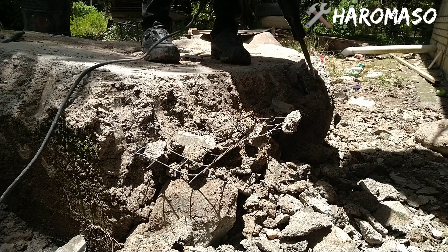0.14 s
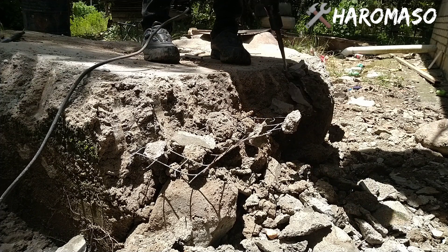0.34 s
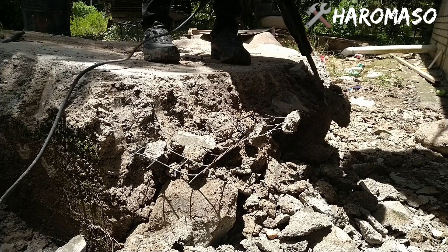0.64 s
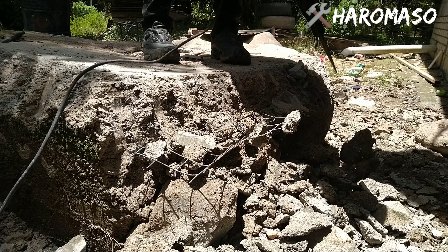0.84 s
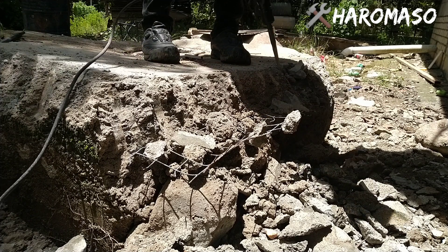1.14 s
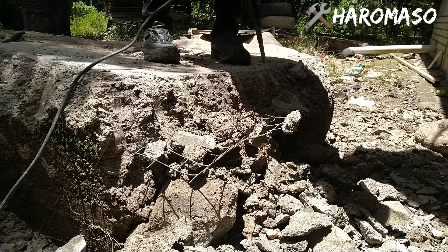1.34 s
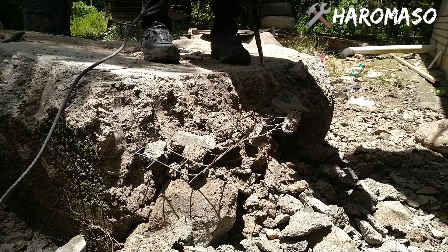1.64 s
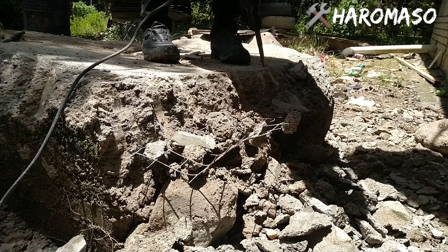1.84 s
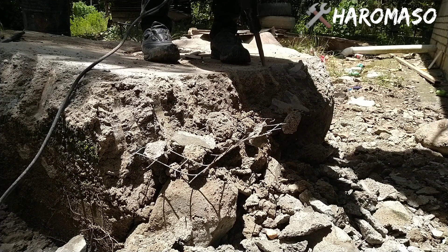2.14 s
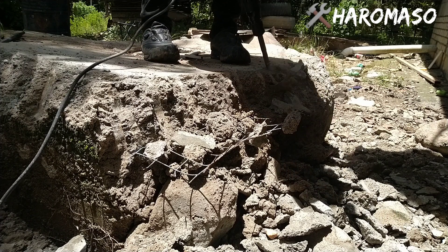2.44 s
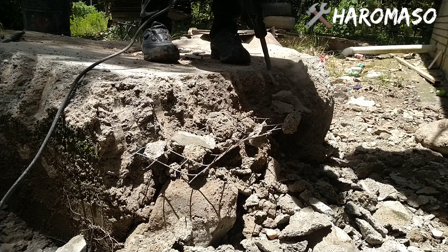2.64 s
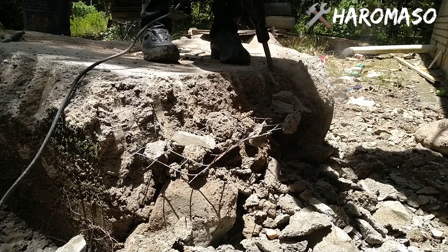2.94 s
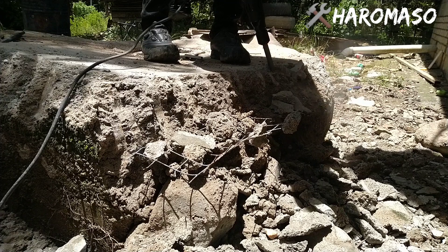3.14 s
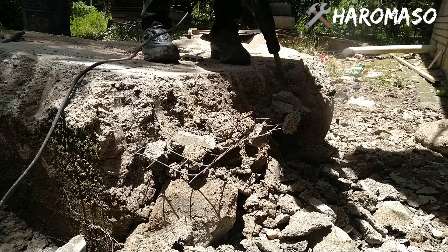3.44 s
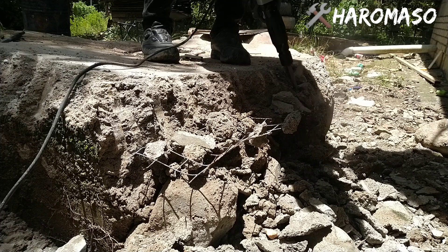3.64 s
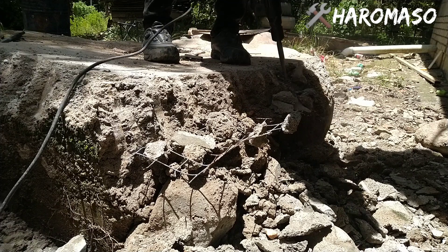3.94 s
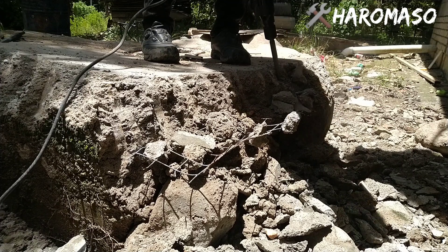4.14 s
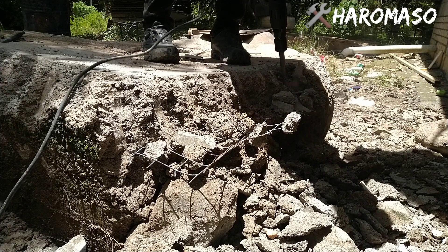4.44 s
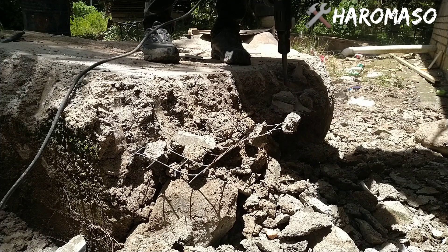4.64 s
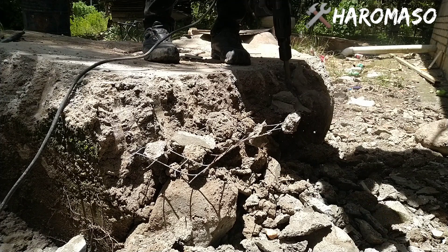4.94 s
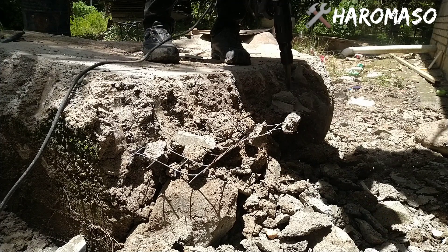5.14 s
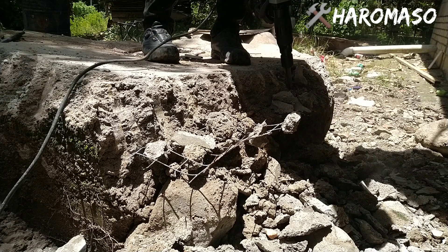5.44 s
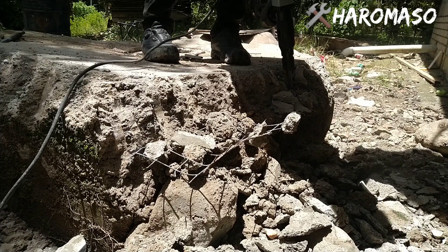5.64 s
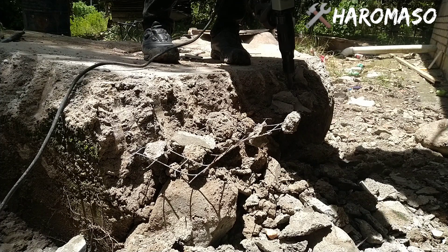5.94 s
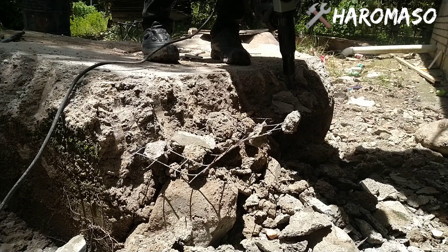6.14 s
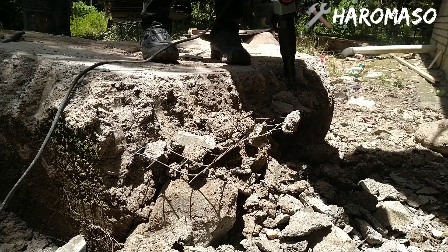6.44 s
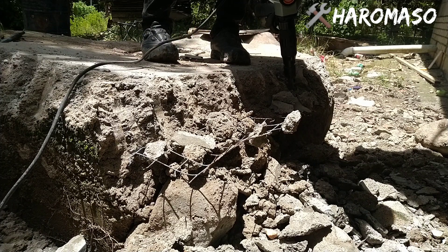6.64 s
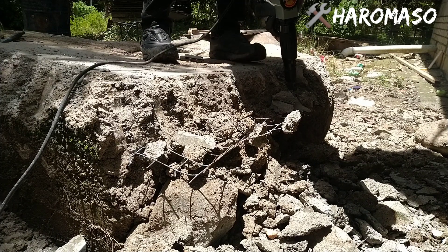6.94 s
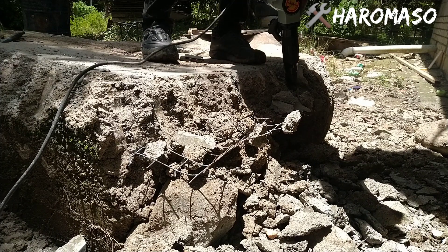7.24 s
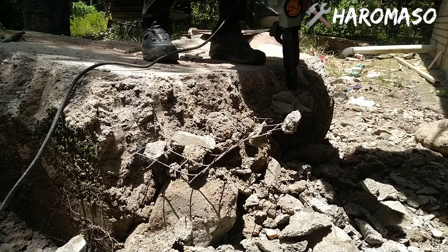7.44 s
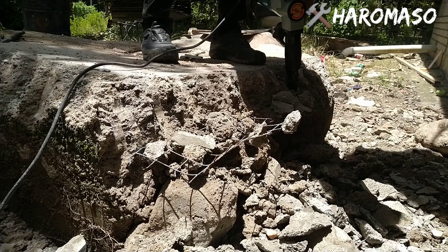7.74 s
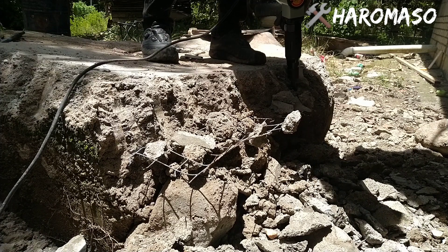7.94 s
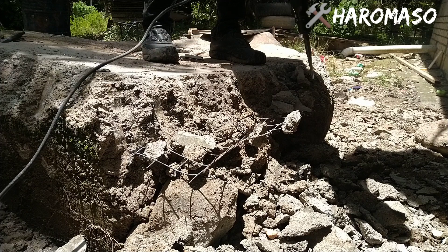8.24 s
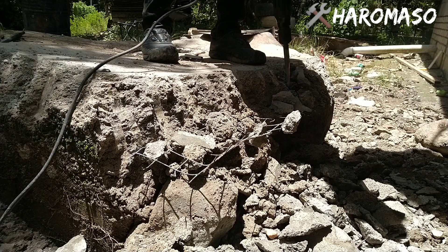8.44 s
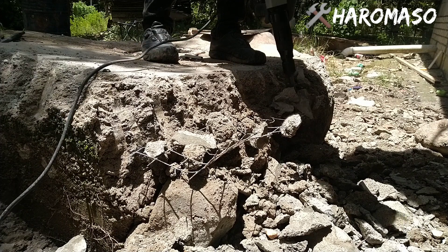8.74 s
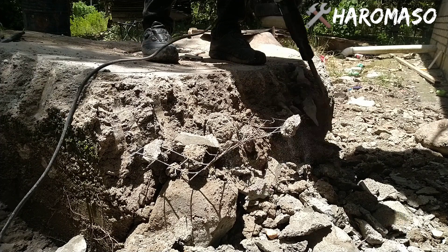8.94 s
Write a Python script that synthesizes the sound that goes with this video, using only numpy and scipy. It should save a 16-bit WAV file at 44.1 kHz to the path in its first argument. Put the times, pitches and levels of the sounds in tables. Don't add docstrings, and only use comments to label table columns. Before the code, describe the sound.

An electric demolition hammer races with a whine, then pounds concrete in rapid ringing blows, lifting and biting again as lumps crack off.

```python
import sys
import numpy as np
from scipy import signal
from scipy.fft import rfft, irfft, next_fast_len
from scipy.io import wavfile
from scipy.ndimage import uniform_filter1d, minimum_filter1d, map_coordinates

SR = 44100
rng = np.random.default_rng(int(sys.argv[2]) if len(sys.argv) > 2 else 0)


def to_linear_factor(level_db):
    exponent = np.asarray(level_db, float) / 20
    return 10 ** exponent


def output_pcm(signal):
    pcm = np.clip(np.atleast_2d(signal).T, -1, 1) * 32767
    wavfile.write(sys.argv[1], SR, np.round(pcm).astype(np.int16))


N = 400428
T = np.arange(N) / SR

# time_s, speed_turns_per_s
CRANK_SPEED = [(0, 62.6), (.4, 64.8), (1.62, 65.5), (2.3, 56.5), (2.65, 55), (2.8, 51.3), (3, 50.5),
               (3.62, 50.4), (3.92, 59.3), (4.15, 62.6), (4.5, 64.5), (4.95, 53), (5.3, 50.1), (7.82, 50),
               (8.09, 58.9), (8.32, 62.7), (8.76, 64.9), (9.08, 64)]
# time_s, load_0_to_1
BEARING_LOAD = [(0, 0), (1.6, 0.22), (1.7, 0.4), (2.6, 0.51), (2.9, 0.45), (3.65, 0.67), (3.88, 0.13),
                (4.46, 0.1), (4.52, 0.42), (5, 0.66), (5.3, 0.64), (7.85, 0.87), (8, 0.27), (8.72, 0.18),
                (8.78, 0.4), (8.88, 0.45), (8.92, 0), (9.08, 0.46)]


def unit(x):
    return x / np.sqrt(np.mean(x ** 2) + 1e-20)


def along(points, hz):
    f, v = np.transpose(points)
    return np.interp(np.log(hz + 1), np.log(f + 1), v)


def curves(rows):
    s, *cols = np.transpose(rows)
    return [np.interp(T, s, c) for c in cols]


def wobble(rate):
    knots = rng.standard_normal(int(N * rate / SR) + 4)
    return map_coordinates(knots, [T * rate])


def noise():
    return rng.standard_normal((2, N))


def drift(depth, rate):
    direct = depth * wobble(rate)
    scattered = depth * wobble(rate) + np.pi * wobble(rate / 4)
    return np.array([direct, scattered])


def filtered(x, response):
    m = next_fast_len(N + 8192)
    return irfft(rfft(x, m) * response(np.fft.rfftfreq(m, 1 / SR)), m)[..., :N]


def coloured(x, spectrum):
    return unit(filtered(x, lambda hz: to_linear_factor(along(spectrum, hz))))


def resonant(x, modes):
    def bank(f):
        total = 0
        for k, (centre, width, db) in enumerate(modes):
            damping = 1j * f * width
            total = total + (-1) ** k * to_linear_factor(db) * damping / (centre * centre - f * f + damping)
        return total
    return unit(filtered(x, bank))


def power_sum(*dbs):
    return 10 * np.log10(sum(to_linear_factor(2 * db) for db in dbs))


def spells(rows, rise, fall):
    t = T[::64]
    s, length, *cols = (c[:, None] for c in np.transpose(rows))
    loss = rise * np.clip(s - t, 0, 1) + fall * np.clip(t - s - length, 0, 1)
    return [np.interp(T, t, power_sum(*(c - loss))) for c in cols]


def blend(values, touch, depth):
    free, bearing, sunk = values
    return free + touch * (bearing - free + depth * (sunk - bearing))


def crank():
    beats = [2.8776, 3.1338, 3.3736, 3.631, 5.1314, 5.3684, 5.8688, 6.369, 6.8698, 7.1304, 7.6316]
    turns = np.cumsum(curves(CRANK_SPEED)[0]) / SR
    at = np.interp(beats, T, turns)
    error = np.unwrap(at - np.round(at), period=1)
    return turns - np.interp(T, beats, error)


def speed_lag():
    return curves(CRANK_SPEED)[0] - max(v for _, v in CRANK_SPEED)


def beat(turns, late, sharp):
    return unit(np.exp(sharp * (np.cos(2 * np.pi * (turns - late)) - 1)))


def stroke_throb(turns, load):
    return 1 + (0.1 + 0.33 * load) * beat(turns, late=0.15, sharp=3.5)


def blows(turns, late, scatter_db):
    hit = np.diff(np.floor(turns - late), prepend=0) > 0
    scattered = .2 + .7 * wobble(3)
    return hit * to_linear_factor(scatter_db * wobble(40)) * np.array([np.ones(N), scattered])


def rattle(rate, spread_db):
    contact = rng.random(N) < rate / SR
    return contact * to_linear_factor(spread_db * rng.standard_normal(N)) * rng.choice([-1, 1], N)


def state():
    # start_s, length_s
    contact = [
        (1.67, 2.21),
        (4.51, 3.37),
        (8.78, 0.091),
    ]
    # time_s, depth_0_to_1
    sink = [(1.66, 0), (2.6, 0.04), (3.3, 0.47), (3.42, 0.21), (3.86, .15), (4.5, 0), (4.9, 0.19),
            (5.3, 0.63), (5.7, 1), (6.4, 1), (7, 0.69), (7.6, 0.98), (7.9, 0.98), (8.1, 0.1)]
    # start_s, length_s, upper_ring_db, lower_ring_db
    clangs = [(.16, .03, -34, -18), (.59, 0.035, -26, -18), (1.66, 0.038, -19.5, -14),
              (1.88, 0.031, -17, -14), (2.03, 0.1, -19.5, -18), (2.22, 0.17, -19, -16.5),
              (2.45, 0.19, -19, -21), (2.74, 0.059, -18, -28), (2.86, .08, -19, -15),
              (3.03, 0.25, -25, -18), (3.45, 0.079, -19, -18), (3.55, 0.13, -15.5, -14),
              (3.77, 0.08, -20.5, -16), (4.5, 0.018, -17.5, -25), (4.56, .07, -14.5, -19),
              (4.78, 0.063, -16.5, -12.5), (4.88, 0.12, -17.5, -27), (5.04, 0.11, -15, -22),
              (5.2, 0.29, -19, -41), (8.46, .03, -26, -40), (8.66, 0.027, -15, -28),
              (8.77, 0.022, -21, -28), (8.84, 0.034, -18.5, -19.5), (9.04, 0.046, -32, -17)]
    lift_s = .04
    touch = sum(np.clip(1 + np.minimum(T - s, s + length - T) / lift_s, 0, 1) for s, length in contact)
    depth = np.clip(curves(sink)[0], 0, 1)
    upper, lower = spells(clangs, rise=200, fall=157)
    upper = power_sum(upper, blend((-41.5, -21, -28.5), touch, depth ** 2))
    lower = power_sum(lower, blend((-21, -25, -31), touch, depth ** 2))
    knee_db, slope, load_db = -24, 0.44, 3.5
    duck = -slope * power_sum(0, upper - knee_db) - load_db * touch
    return touch, depth, upper, lower, duck


def cooling_air(turns, load, duck):
    # frequency_hz, level_db_per_hz
    air_spectrum = [(120, -61), (200, -41), (235, -44), (323, -16.5), (378, -11), (800, -14), (938, -8),
                    (1030, -8.5), (1950, -2.5), (2320, -3), (2770, -3), (3990, -2), (4470, -3.5),
                    (4840, -3), (9000, -5.5), (11700, -3.5), (19800, -120)]
    # start_s, length_s, roar_db
    slaps = [
        (.67, 0.015, -24),
        (1.5, 0.21, -23.5),
        (4.2, .22, -26),
        (8.02, 0.23, -35),
        (8.71, .02, -19.5),
        (1.8, .04, -24.5),
        (1.96, .04, -27),
        (3.71, 0.034, -21),
        (3.87, 0.027, -20),
        (8.93, 0.041, -31),
    ]
    roar_db = power_sum(-20, *spells(slaps, 150, 200)) + duck
    flutter_db = 0.94 * wobble(90) + 0.12 * wobble(19)
    air = coloured(noise() * stroke_throb(turns, load) * to_linear_factor(flutter_db), air_spectrum)
    return to_linear_factor(roar_db + 3.5) * air


def fan(turns, touch, depth):
    blades, wheel_teeth, pinion_teeth = 12, 41, 7
    fan_db = blend((-34, -51, -44), touch, depth) + .3 * speed_lag() * (1 - touch)
    fan_db = fan_db + .8 * wobble(4) + 1.6 * wobble(16)
    tone = np.sin(2 * np.pi * blades * wheel_teeth / pinion_teeth * turns + .15 * wobble(12))
    direct_and_scattered = np.array([[1], [.3]])
    return to_linear_factor(fan_db + 8.5) * tone * to_linear_factor(1.1 * wobble(14)) * direct_and_scattered


def gear_train(turns, touch, depth):
    # crank_order, level_db
    gears = [(19, -16), (39, -6), (40, -3), (42, -2), (44, -2), (80, -13), (82, -14), (85, -13)]
    gear_db = blend((-31, -48.5, -61), touch, depth) + 0.2 * speed_lag() * (1 - touch)
    tones = 0
    for order, db in gears:
        level = to_linear_factor(db - 3.5 + 2 * wobble(5) + 4 * wobble(22))
        tones = tones + level * np.sin(2 * np.pi * order * turns + drift(.8, 30))
    return to_linear_factor(gear_db + 2.5) * tones


def barrel(turns, load, touch, depth):
    # frequency_hz, width_hz, level_db
    barrel_modes = [(2038, 170, 2.5), (2510, 88, -5), (4210, 560, -4.5)]
    faint_db, sunk_db = -52, -26
    barrel_db = power_sum(faint_db, sunk_db + 17 * np.log10(depth + 0.00093))
    barrel_db = barrel_db - 25 * (1 - touch) + 0.68 * wobble(2.957)
    strikes = unit(blows(turns, late=-0.091, scatter_db=1.8))
    drive = strikes + .3 * stroke_throb(turns, load) * noise()
    bite = resonant(resonant(drive, barrel_modes), barrel_modes)
    return to_linear_factor(barrel_db + 1.0) * bite


def collar(turns, load, touch, depth):
    modes = [(2500, 520, 0)]  # frequency_hz, width_hz, level_db
    skating = touch * np.clip(1 - 5 * depth, 0, 1)
    tone = resonant(resonant(stroke_throb(turns, load) * noise(), modes), modes)
    return skating * to_linear_factor(-36 + 3.3 * wobble(7)) * tone


def cracks():
    # time_s, peak_db
    lumps = [
        (1.74, -25),
        (2.04, -21),
        (2.31, -26),
        (2.554, -19.5),
        (2.679, -26),
        (4.829, -20.5),
        (7.029, -30),
        (8.828, -33),
    ]
    # frequency_hz, width_hz, level_db
    lump_modes = [(60, 60, -3), (170, 180, 1), (450, 640, -5.5)]
    jolts = np.zeros((2, N))
    for s, db in lumps:
        jolts[:, round(s * SR)] = to_linear_factor(db) * np.array([1, .6])
    knock = resonant(jolts, lump_modes)
    return to_linear_factor(-15) * knock / np.abs(knock).max()


def slab(turns, load, touch, depth, duck):
    # start_s, length_s, thump_db
    heaves = [(.62, .28, -55), (1.78, .14, -37.5), (2.04, 0.024, -31.5), (2.2, 0.052, -35.5),
              (2.29, 0.033, -39), (2.53, 0.042, -30), (2.63, 0.32, -35.5), (2.95, 0.77, -39),
              (3.8, 0.035, -40), (4.52, .08, -40), (4.7, 0.24, -38), (4.95, 0.572, -39.5),
              (6.65, 0.17, -45), (6.92, .04, -42), (7.01, .06, -39), (7.88, .06, -45), (8.8, .07, -39.5)]
    # frequency_hz, level_db_per_hz
    thud_spectrum = [(15, -35), (25, -21), (49, 3.5), (75, 0.5), (303, -4), (361, -11), (500, -4),
                     (650, -40), (1100, -120)]
    # frequency_hz, width_hz, level_db
    knock_modes = [(303, 67, -6.5), (478, 14, -21), (667, 54, -1), (1075, 126, 3.5), (1365, 290, -2)]
    heave_db, = spells(heaves, rise=254, fall=208)
    thump_db = power_sum(heave_db, blend((-59.5, -46, -50), touch, depth)) + 0.51 * wobble(10)
    knock_db = power_sum(heave_db - 5.5, -26.5 + duck)
    push = unit(blows(turns, late=0.311, scatter_db=3.0)) * load + 0.62 * noise()
    rap = unit(blows(turns, late=0.1456, scatter_db=1.5)) * load + 0.3 * noise()
    thump = to_linear_factor(thump_db - 3.5) * coloured(push, thud_spectrum)
    return thump + to_linear_factor(knock_db - 5.5) * load * resonant(rap, knock_modes)


def grit(turns, load, duck):
    # frequency_hz, level_db_per_hz
    grit_spectrum = [(3000, -19), (5000, -12), (6500, -2.5), (8000, 3), (10000, 4), (11000, 3),
                     (12000, -0.5), (16000, -6)]
    grit_db = -22 + 0.34 * duck
    bursts = 1 + .9 * load * beat(turns, late=.14, sharp=4) * to_linear_factor(3 * wobble(45))
    hiss = noise() * bursts * to_linear_factor(1.75 * wobble(110) + 2.0 * wobble(20))
    return to_linear_factor(grit_db + 3.5) * coloured(hiss, grit_spectrum)


def ring(kicks, hz, clear, t60, choked_t60):
    kicks = kicks * np.exp(2j * np.pi * rng.random((2, N)))
    free, choked = (signal.lfilter([1], [1, -to_linear_factor(-60 / life / SR)], kicks) for life in (t60, choked_t60))
    swing = clear * free / free.real.std() + (1 - clear) * choked / choked.real.std()
    return (swing * np.exp(2j * np.pi * np.cumsum(hz) / SR)).real


def chisel(turns, load, touch, depth, upper_db, lower_db):
    # frequency_hz, width_hz, level_db
    shank_modes = [(6660, 60, -8), (7700, 70, -5), (10430, 50, 0), (10710, 40, -2)]
    upper_db = upper_db + 3.2 * wobble(14)
    lower_db = lower_db + 0.67 * wobble(12)
    upper_hz = 11740 + 180 * depth
    lower_hz = blend((10930, 10800, 10800 + 600), touch, depth)
    struck = np.maximum(touch, np.clip((upper_db + 28) / 8, 0, 1))
    clear = blend((.3, .9, .15), struck, depth ** 2)

    def kicks():
        return 5 * load * blows(turns, late=.1, scatter_db=3.5)[0] + rattle(rate=390, spread_db=2.5)

    upper = to_linear_factor(upper_db + 1.0) * ring(kicks(), upper_hz, clear, t60=0.023, choked_t60=0.0078)
    lower = to_linear_factor(lower_db - 3.5) * ring(kicks(), lower_hz, clear, t60=.016, choked_t60=.004)
    shank = resonant(np.array([kicks(), kicks()]), shank_modes)
    return upper + lower + to_linear_factor(lower_db - 4.5) * (1.15 - load) * shank


def scene():
    # frequency_hz, correlation
    likeness = [(60, 0.45), (130, 0.21), (290, 0.89), (640, 0.7), (1410, 0.25), (3100, 1), (6820, 0.1),
                (12000, 0.052)]
    # frequency_hz, difference_db
    lean_points = [(60, 5.5), (150, 8), (300, 4.5), (700, 3.5), (1300, 4), (2400, 1.5), (5000, 2),
                   (8000, -0.5), (10300, 0), (11200, 3.5), (11900, 11), (15000, 31)]
    turns = crank()
    load = np.clip(curves(BEARING_LOAD)[0], 0, 1)
    touch, depth, upper_db, lower_db, duck = state()

    pair = cooling_air(turns, load, duck) + fan(turns, touch, depth) + gear_train(turns, touch, depth)
    pair = pair + barrel(turns, load, touch, depth) + collar(turns, load, touch, depth)
    pair = pair + cracks() + slab(turns, load, touch, depth, duck)
    pair = pair + grit(turns, load, duck) + chisel(turns, load, touch, depth, upper_db, lower_db)

    def share(hz):
        angle = np.arccos(np.clip(along(likeness, hz), -1, 1)) / 2
        return np.array([np.cos(angle), np.sin(angle)])

    def ports(hz):
        sign = np.array([[1], [-1]])
        lag = np.exp(-1j * np.pi * hz * 6e-5 * sign)
        return lag * to_linear_factor(along(lean_points, hz) / 2 * sign)

    mid, side = filtered(pair, share)
    return to_linear_factor(3.0) * filtered(np.array([mid + side, mid - side]), ports)


def limiter(pair):
    need = np.minimum(1, .86 / (np.abs(pair) + 1e-9))
    return pair * uniform_filter1d(minimum_filter1d(need, size=60), size=60)


def sparse_bands(pair):
    # start_s, length_s, share_near_13.6_khz, share_near_15_khz
    scraps = [
        (0, 1.66, 0.28, .6),
        (1.734, 0.48, .01, 0.38),
        (2.55, 0.62, .03, 0.53),
        (3.813, 0.59, .5, 0.5),
        (5.598, 0.57, 0.32, .3),
        (6.65, 1.23, 0.19, 0.42),
        (7.903, 0.68, 0.53, 0.36),
        (8.905, 0.17, .4, 0.8),
    ]
    hz, t, z = signal.stft(pair, SR, nperseg=1024)

    def spell(col):
        total = 0.033
        for row in scraps:
            inside = np.minimum(t - row[0], row[0] + row[1] - t)
            total = total + row[col] * np.clip(1 + inside / 0.07, 0, 1)
        return total

    def centre(at_hz, width):
        return np.exp(-((hz[:, None] - at_hz) / width) ** 4)

    def lots(bins, hops):
        draws = rng.random((len(hz), len(t) // hops + 1))
        return np.kron(draws, np.ones((bins, hops)))[:len(hz), :len(t)]

    def near(bins, hops):
        return uniform_filter1d(uniform_filter1d(np.abs(z) ** 2, bins, axis=1), hops, axis=2)

    share = .14 * centre(12250, 250) + spell(col=2) * centre(13650, 550) + spell(col=3) * centre(14970, 420)
    kept = (lots(6, 3) < share) | (hz[:, None] < 12050)
    usual = np.exp(uniform_filter1d(np.log(np.abs(near(4, 9)) + 1e-18), 40, axis=1))
    masked = (.52 + .12 * np.interp(t, *np.transpose(BEARING_LOAD))) * centre(5300, 3300)
    kept = kept & (near(3, 4) >= masked * usual)
    return signal.istft(z * kept, SR, nperseg=1024)[1][:, :N]


def low_pass(x):
    return signal.sosfilt(signal.butter(12, 15980, fs=SR, output="sos"), x)


def record(dry):
    # frequency_hz, level_db
    edge = [(11990, 0.5), (12030, 6), (12070, -17), (13000, -52), (14300, -3.5), (15000, 2.5), (15900, -26)]
    left, right = limiter(dry)
    pair = filtered(np.array([left + right, left - right]) / 2, lambda hz: to_linear_factor(along(edge, hz)))
    mid, side = sparse_bands(pair)
    return low_pass(np.array([mid + side, mid - side]))


dry = scene()
out = record(dry)
output_pcm(out)
```